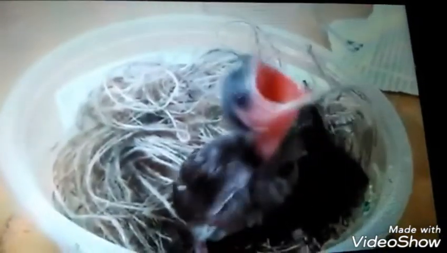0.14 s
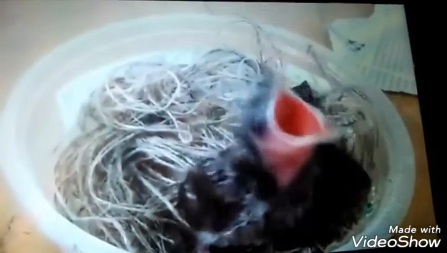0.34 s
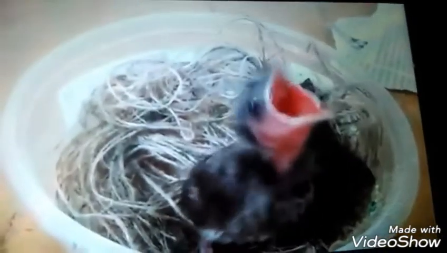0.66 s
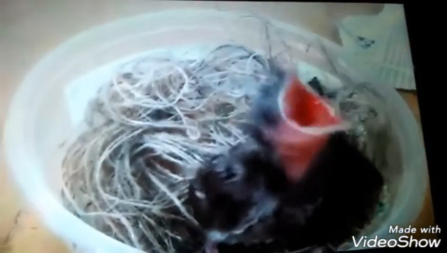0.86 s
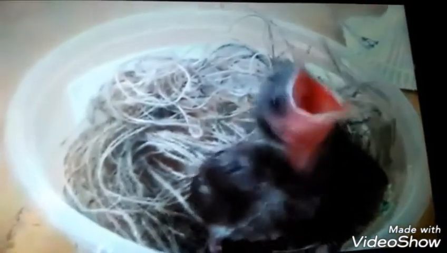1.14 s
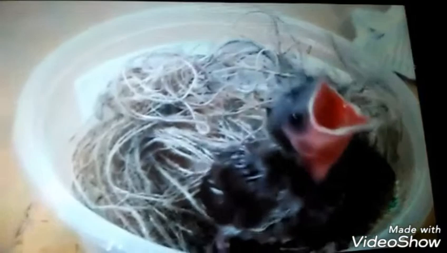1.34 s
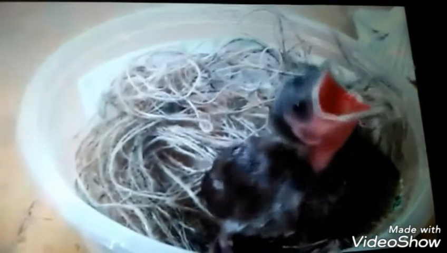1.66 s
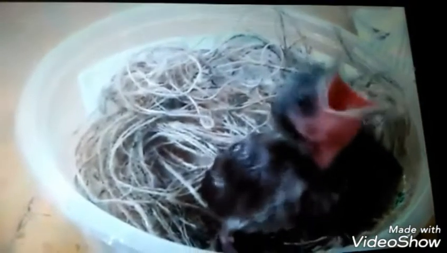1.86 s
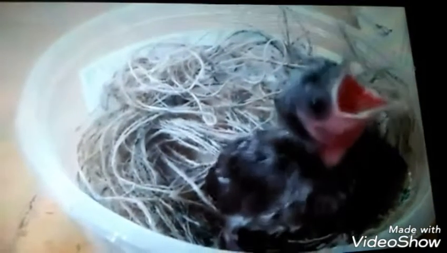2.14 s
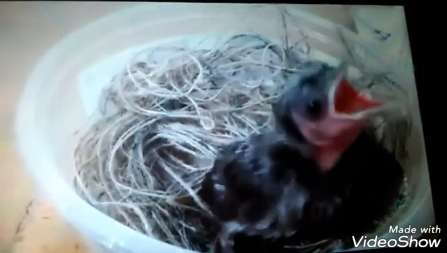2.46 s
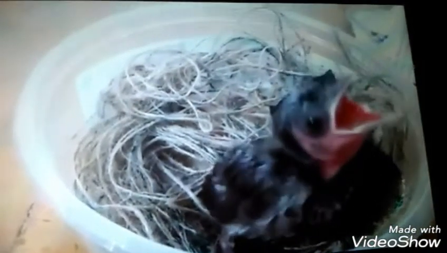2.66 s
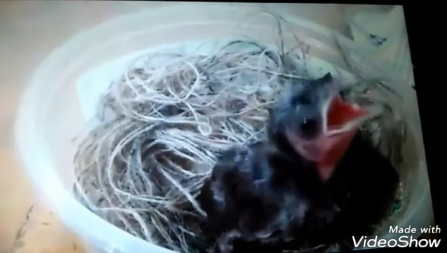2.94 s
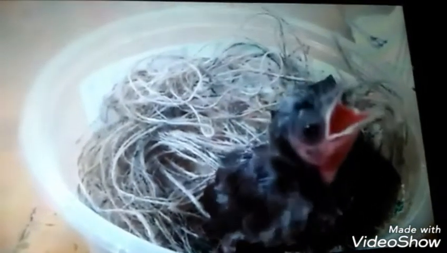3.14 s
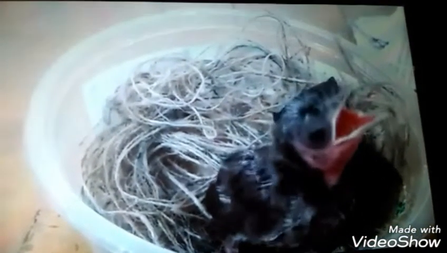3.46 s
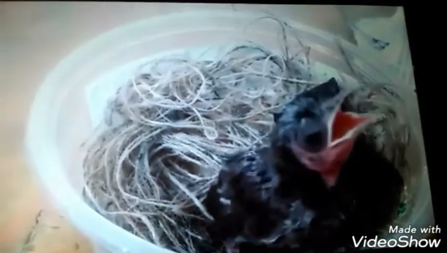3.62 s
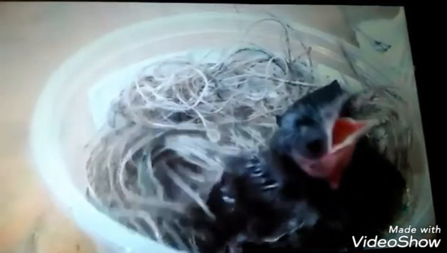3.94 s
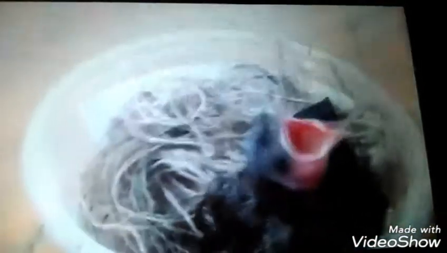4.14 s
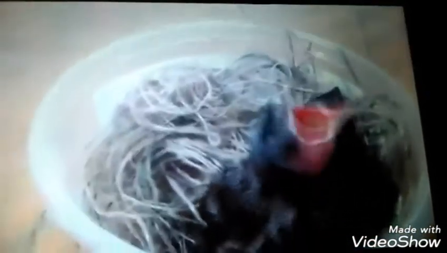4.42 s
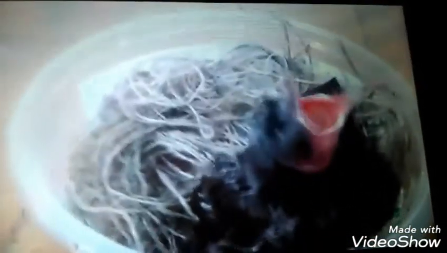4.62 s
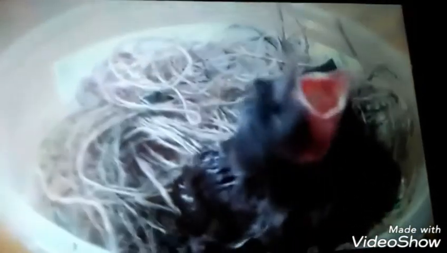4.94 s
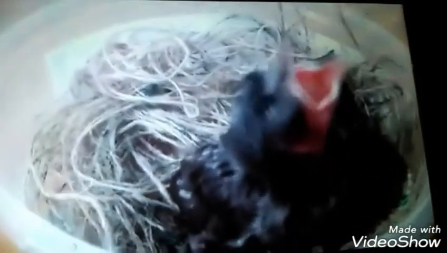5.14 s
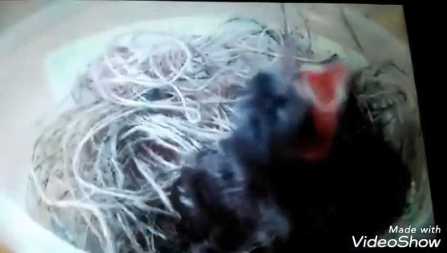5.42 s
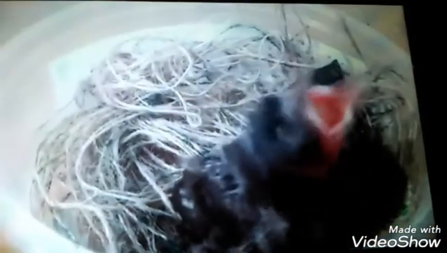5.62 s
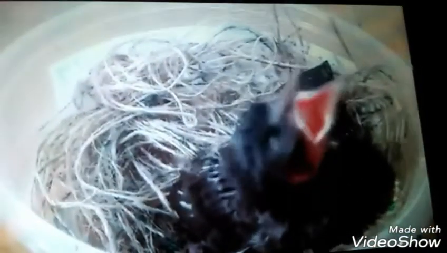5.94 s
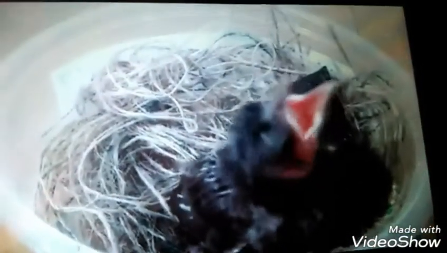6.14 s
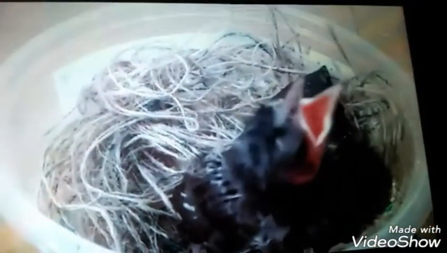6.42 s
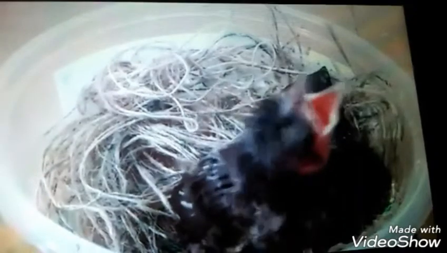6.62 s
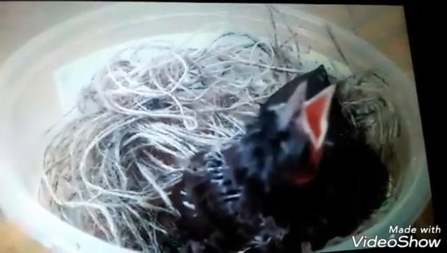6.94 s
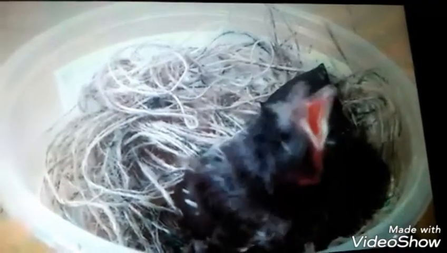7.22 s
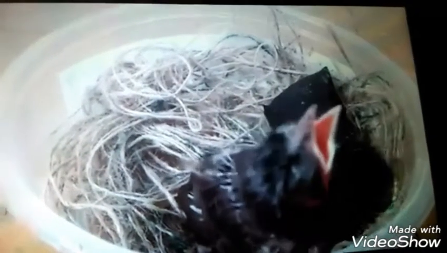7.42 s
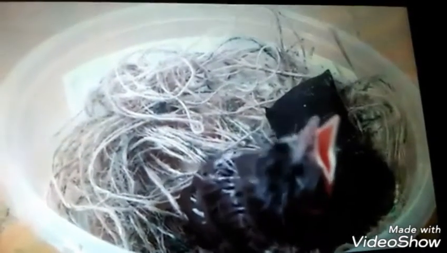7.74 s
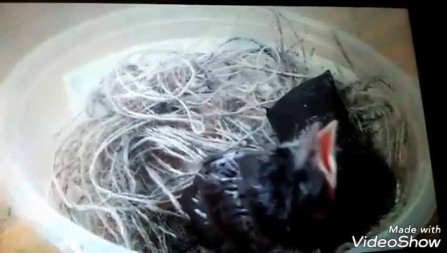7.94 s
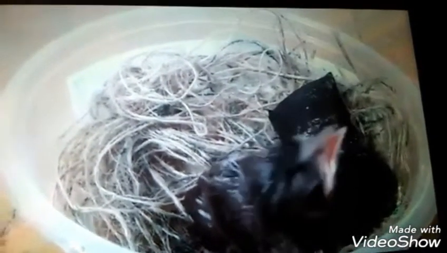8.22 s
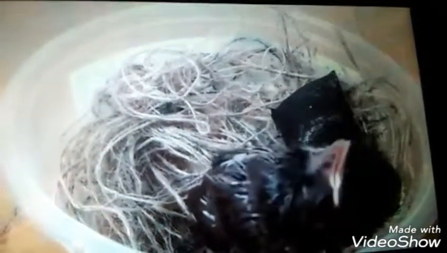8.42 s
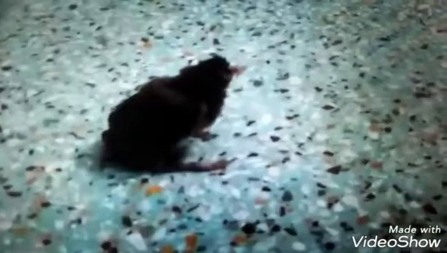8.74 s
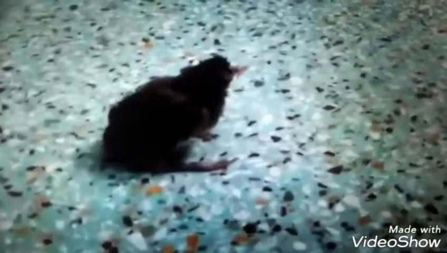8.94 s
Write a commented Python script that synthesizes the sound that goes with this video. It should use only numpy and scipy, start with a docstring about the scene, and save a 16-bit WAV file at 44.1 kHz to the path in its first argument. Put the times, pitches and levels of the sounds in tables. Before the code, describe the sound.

Close, piercing baby bird cheeps repeat steadily in a plastic bowl indoors, turning raspier and then thinner, with airy hiss and low dull knocks behind.

```python
"""Short begging chirps of a nestling in a plastic bowl sound throughout: a clean quavering whistle near 3 kHz,
whose octave the open throat reinforces, breaks into a fast trill that is often hoarse; faint wheezes fall between.
The voice is a sum of frequency-modulated partials, coloured by resonances and reflected by bowl and room.
A soft noise hiss trails each chirp and sometimes swells by itself.
Behind it lie shaped room noise with a faint hum, and the low rubs and knocks of a hand on the microphone."""
import sys
import numpy as np
from scipy import signal
from scipy.fft import rfft, irfft
from scipy.io import wavfile
from scipy.ndimage import uniform_filter1d

SR = 44100
rng = np.random.default_rng(int(sys.argv[2]) if len(sys.argv) > 2 else 0)


def generate_wav(sig):
    """Save sig (samples, or channels by samples) to the path in sys.argv[1] as 16-bit PCM at SR."""
    pcm = np.round(np.clip(np.atleast_2d(sig).T, -1, 1) * 32767).astype(np.int16)
    wavfile.write(sys.argv[1], SR, pcm)


N = 400428

# clean notes, nominal values that whistle() shapes: t/s, length/s, start f/Hz, rise/Hz, quaver depth/Hz,
# fundamental level/dB, octave level/dB, swell of the octave/dB, half-line level/dB
WHISTLES = [(0.03, 0.079, 2970, 219.5, 29, -37, -31, 2.5, -81),
            (0.409, 0.054, 2998, 209, 13, -35.5, -35, -2.5, -72),
            (0.726, 0.081, 2950, 129.5, 89, -38, -32, -1.5, -77.5),
            (1.18, 0.03, 2997, 70, 14, -41.5, -41.5, 11, -84),
            (1.479, 0.092, 2910, 112, 60, -39.5, -32, 0, -87.5),
            (1.962, 0.029, 2978, 130.5, 9.4, -43.5, -50.5, 14, -80.5),
            (2.259, 0.004, 2933, -24, 8.8, -41.5, -39, 6, -59),
            (2.335, .088, 2780, 107, 27, -54, -60.5, 8, -82),
            (2.462, 0.048, 3030, 79, 16, -37, -80, 12, -64),
            (2.816, 0.046, 2906, 138, 57, -36.5, -60.5, 35, -82),
            (2.865, 0.051, 3034, 97, 46, -37.5, -54.5, 4, -60),
            (3.255, 0.025, 3027, 50, 20, -37, -64, -1, -70),
            (3.604, 0.06, 2930, 123, 30, -34.5, -47.5, 20, -86),
            (4.053, 0.049, 2977, 132, 36, -39.5, -54.5, 3, -70),
            (4.425, 0.044, 3040, 147, 31, -43, -60, 1, -69),
            (4.908, 0.074, 2973, 129, 26, -36, -35.5, 11, -76),
            (5.367, 0.085, 2908, 150, 27, -38, -28.5, -1, -56),
            (6.015, 0.04, 2892, 214.5, 10.5, -39, -28.5, 0, -52),
            (6.301, .064, 2950, 26, 51, -35, -23.5, -0.5, -50),
            (6.844, 0.03, 3560, -56.5, 25, -57, -69, 3.5, -95),
            (7.123, 0.024, 3520, 9, 11, -51, -51, 3, -90),
            (7.141, 0.073, 2936, 119.5, 61, -35, -24.5, -0.5, -53),
            (7.339, .013, 3800, -60.5, 20, -50, -66, 2, -47.5),
            (7.351, 0.014, 3180, 50, 25, -74, -42.5, 4, -41),
            (7.842, 0.018, 3600, -62, 15, -63, -80.5, -2, -52),
            (7.857, 0.016, 2944, 20, 14, -69, -40.5, 11, -51),
            (7.874, 0.018, 3080, 185, 12, -62, -42, 3, -36),
            (8.071, 0.056, 2925, 85, 43, -75, -61, -3, -90),
            (8.337, .015, 3600, -19.5, 15, -62, -77.5, 4, -73),
            (8.355, .052, 2973, 49, 34, -63, -32.5, 2.5, -49),
            (8.409, 0.018, 3106, 186, 18, -59, -41.5, 2, -43),
            (8.965, 0.0093, 3650, -27, 15, -61, -68, -6, -72.5),
            (8.974, 0.022, 3060, -40, 33, -65, -36, 11.5, -51)]
# trilled notes, nominal values that trill() shapes: t/s, length/s, f/Hz, trill rate/Hz, swing/Hz,
# hoarseness 0-1, fundamental level/dB, half-line level/dB, octave level/dB, beak resonance f/Hz
TRILLS = [(0.096, 0.047, 3136, 77, 186, 0.01, -47, -74, -36, 6090),
          (0.449, .065, 3150, 82, 230, 0.07, -44.5, -69, -35.5, 6130),
          (0.8, 0.032, 3078, 110, 171, 0.05, -48, -80, -40.5, 5850),
          (1.203, 0.086, 3180, 81, 231, 0.16, -45, -85, -40.5, 5870),
          (1.567, 0.019, 3114, 83, 168, 0.03, -55, -83, -56, 5930),
          (1.995, 0.07, 3150, 101, 217, 0.2, -46.5, -74, -42.5, 5880),
          (2.504, 0.084, 3100, 88, 230, .33, -46, -56, -52, 5550),
          (2.915, .034, 3240, 86, 190, 0.17, -54.5, -56.5, -58, 5100),
          (3.279, 0.091, 3130, 96, 352, 0.33, -51, -58, -47, 5600),
          (3.667, 0.063, 3015, 98, 214, 0.27, -45, -70, -40, 5800),
          (4.092, 0.087, 3130, 117, 363, .42, -47.5, -61, -44.5, 5590),
          (4.46, 0.092, 3416, 84, 386, 0.51, -49, -49.5, -55, 5920),
          (4.978, 0.061, 3140, 88, 215, 0.44, -51, -58, -36, 6130),
          (5.438, 0.025, 3110, 91, 188, .23, -55, -58, -42.5, 6300),
          (6.049, 0.075, 3216, 100, 233, 0.3, -49, -56.5, -34, 6070),
          (6.362, .026, 3173, 66, 183, 0.27, -57, -67, -34, 6070),
          (6.864, 0.079, 3340, 80, 280, 0.21, -49, -78, -31.5, 6050),
          (7.217, 0.016, 3125, 62, 200, 0.05, -51.5, -67.5, -27, 6200),
          (7.363, 0.078, 3610, 92, 400, 0.3, -52.5, -44, -45.5, 6300),
          (7.892, 0.058, 3557, 94, 346, 0.28, -52, -44, -49.5, 6140),
          (8.423, 0.033, 3196, 75, 201, 0.12, -74, -66, -52, 6200),
          (8.996, .064, 3474, 89, 340, .3, -54, -50, -41, 6130)]


def chick(whistle_db=-2.0, trill_db=-1):
    """Superposition: all whistles and trills add up to one dry voice."""
    voice = np.zeros(N)
    for row in WHISTLES:
        s, note = whistle(row)
        add(voice, s, gain_of(whistle_db) * note)
    for row in TRILLS:
        s, note = trill(row)
        add(voice, s, gain_of(trill_db) * note)
    return voice


QUAVERS_PER_S = 48


def whistle(row, jitter_hz=14, shimmer_db=1.94, quaver_db=2.0, third_db=-42, lead_in_db=-22, onset_db=2,
            widening=1.26, bend=1.6, half_swell_db=13, air_db=-31, beak_hz=6200):
    """Frequency modulation: the syrinx sings a rising tone with a widening quaver and a strong octave."""
    s, length, start_hz, rise_hz, depth_hz, first_db, octave_db, swell_db, half_db = row
    early = .2 * length  # soft fade-in ahead of the nominal start
    t, gate = note_gate(length + early, rise=2 * early, fall=.004)
    t = t - early
    progress = np.clip(t / length, 0, 1)
    gate = gate * gain_of(np.interp(t, [-early, 0, early / 2], [lead_in_db, lead_in_db / 2, 0]))

    quaver = np.cos(2 * np.pi * QUAVERS_PER_S * t)
    hz = start_hz + rise_hz * progress ** bend - depth_hz * quaver * (0.53 + widening * progress)
    phase = 2 * np.pi * np.cumsum(hz + jitter_hz * wander(len(t), 130)) / SR

    first = gain_of(first_db + 5.2 * (progress - 1.5)) * np.sin(phase)
    swell_points = [-swell_db / 2 - onset_db, -swell_db / 2, swell_db / 2]
    upper_db = octave_db + np.interp(progress, [0, 1 / 6, 5 / 6], swell_points)
    harmonics = np.sin(2 * phase) + gain_of(third_db) * np.sin(3 * phase)
    upper = gain_of(upper_db + quaver_db * quaver) * harmonics
    # as the note strains, the period doubles: a half-line grows below the octave, and air leaks past
    half = gain_of(half_db + half_swell_db * (progress - 1.5)) * np.sin(3 / 2 * phase)
    breath = evened(throat(rng.standard_normal(len(t)), s, beak_hz))
    air = gain_of(octave_db + air_db) * progress ** 2 * breath

    shimmer = gain_of(shimmer_db * wander(len(t), 78))
    return s + t[0], np.sqrt(2) * gate * (first + upper + half + air) * shimmer


def trill(row, throb_db=5, start_turn=0.18, jitter_hz=130, rasp_db=-1, growth_db=3, arch_db=7, climb_hz=450,
          sink_hz=40, uneven_db=1.85, soft_edge=.05, stumble=0.1, uneven_swing=0.35, snap=0.6):
    """Sawtooth modulation and period doubling: pitch snaps up and slides down; hoarseness makes it stumble."""
    s, length, pitch_hz, rate, swing_hz, rough, first_db, half_db, octave_db, beak_hz = row
    edge = .006 + 2 * soft_edge * rough ** 2
    t, gate = note_gate(length, rise=edge, fall=edge)
    middle = np.clip(t / length, 0, 1) - .5

    uneven_rate = rate * (1 + (0.025 + stumble * rough) * wander(len(t), 90))
    turn = 2 * np.pi * (np.cumsum(uneven_rate) / SR + rate * t[0] + start_turn)
    # snap 0 would be an even vibrato, towards 1 the rise gets abrupt
    saw = np.arctan2(snap * np.sin(turn), 1 - snap * np.cos(turn)) / np.arcsin(snap)
    # the clearest trills sink, hoarse ones climb
    glide_hz = (rough * climb_hz - (1 - rough) * sink_hz) * middle
    swing = swing_hz * (1 - rough / 2 + (0.13 + uneven_swing * rough) * wander(len(t), 85))
    hz = pitch_hz + glide_hz + swing * saw
    phase = 2 * np.pi * np.cumsum(hz + jitter_hz * (rough + 0.12) * wander(len(t), 330)) / SR

    # the drive grows along the note; a hoarse one also arches, and its strength varies at random
    growth = growth_db * (0.5 + rough) * middle
    arch = -arch_db * rough * (2 * middle) ** 2
    effort = gate * gain_of(growth + arch + uneven_db * wander(len(t), 70))
    throb = -throb_db * max(1 - 2 * rough, 0) ** 2 * saw  # clear partials are driven hardest at each slide's foot
    partials = [(1, first_db), (1.5, half_db), (2, octave_db), (2.5, half_db - 24), (3, first_db - 27)]
    voice = 0
    for k, db in partials:
        flutter = 1 + rough * wander(len(t), 360)
        line = effort * gain_of(throb) * np.sin(k * phase) * flutter
        voice = voice + gain_of(db) * evened(throat(line, s, beak_hz, pitch_hz))

    air = evened(throat(effort * rng.standard_normal(len(t)), s, beak_hz, pitch_hz))
    rasp = rough ** 2 * gain_of(rasp_db + max(octave_db, first_db, half_db))
    return s + t[0], voice + rasp * air


# frequency response of throat and bowl together: f/Hz, level/dB
THROAT = [(2300, -25.5), (2750, -11), (3050, -11), (3700, 2), (4200, 12), (4900, 3), (5400, 2), (5900, 2.5),
          (6500, 0), (7100, -7), (8000, -3.5), (8700, -16), (12000, -36)]
# a dip in the voice that fills as the beak closes: t/s, level/dB
NOTCH_DEPTH = [(0, -43), (4.5, -37.5), (7.2, -26), (7.35, -3), (9.08, -7)]
NOTCH_HZ, NOTCH_WIDTH_HZ = 4260, 430
BEAK_DB, BEAK_WIDTH_HZ, BEAK_RISE_HZ_PER_S = 15, 240, 2100
TUNED_DB, TUNED_WIDTH_HZ = 6, 240


def throat(x, s, beak_hz, tuned_hz=3500):
    """Source-filter principle: a rising beak resonance, a second one at tuned_hz and a dip colour the source."""
    size = 16384
    hz = np.fft.rfftfreq(size, 1 / SR)
    t = (np.arange(len(x)) - len(x) / 2) / SR
    depth_db = np.interp(s, *np.transpose(NOTCH_DEPTH))
    notch_db = depth_db * np.exp(-((hz - NOTCH_HZ) / NOTCH_WIDTH_HZ) ** 2)
    beak = gain_of(BEAK_DB) * resonate(x, beak_hz + BEAK_RISE_HZ_PER_S * t, BEAK_WIDTH_HZ)
    tuned = gain_of(TUNED_DB) * resonate(x, tuned_hz, TUNED_WIDTH_HZ)
    return irfft(rfft(x + beak + tuned, size) * gain_of(read(THROAT, hz) + notch_db))[:len(x)]


# faint husky breaths between the chirps: t/s, length/s, level before the soft edges/dB, beak resonance f/Hz
WHEEZES = [(1.069, 0.074, -83, 5500), (4.316, 0.17, -78, 5570), (5.827, 0.066, -71.5, 5560),
           (6.469, 0.04, -51.5, 5070), (6.711, 0.066, -71.5, 5360), (7.701, 0.063, -73.5, 6280)]
WHEEZE_EDGE_S = .04


def wheezes(rough_db=3):
    """Turbulence: air flutters through the chick's throat without a tone."""
    air = np.zeros(N)
    for s, length, db, beak_hz in WHEEZES:
        t, gate = note_gate(length, WHEEZE_EDGE_S, WHEEZE_EDGE_S)
        puff = rng.standard_normal(len(t)) * gain_of(rough_db * wander(len(t), 120))
        add(air, s + t[0], gain_of(db) * gate * evened(throat(puff, s, beak_hz)))
    return air


# small dry ticks: t/s, peak level/dB
TICKS = [(2.264, -47), (7.261, -47), (7.3435, -44)]


def ticks(decay=0.00076, low_hz=4500, high_hz=8500):
    """Impulse excitation: tiny band-passed noise bursts that die quickly, as of the beak or a dry straw."""
    snaps, t = np.zeros(N), np.arange(SR // 50) / SR
    band = signal.butter(2, [low_hz, high_hz], "band", fs=SR, output="sos")
    for s, db in TICKS:
        snap = signal.sosfilt(band, rng.standard_normal(len(t)) * np.exp(-t / decay))
        add(snaps, s, gain_of(db) * snap / abs(snap).max())
    return snaps


# reverberation time, the time to fall by 60 dB: f/Hz, T60/s
ROOM_T60 = [(300, 0.21), (3000, 0.39), (6000, 0.23), (12000, 0.079)]


def room(x, bowl_decay=0.019, tail_db=-21, tail_same=0.93):
    """Reverberation by convolution: quick reflections from bowl and table, then a short diffuse tail."""
    size = SR // 2
    taps = rng.standard_normal((3, size)) * (rng.random((3, size)) < .1)
    hz, t, z = signal.stft(taps, SR, nperseg=256)
    decaying = z * gain_of(-60 * t / read(ROOM_T60, hz)[:, None])
    tail = signal.istft(decaying, SR, nperseg=256)[1][:, :size]
    t = np.arange(size) / SR
    # a shared part and two separate ones make the tail partly alike left and right
    tail = (np.sqrt(tail_same) * tail[2] + np.sqrt(1 - tail_same) * tail[:2]) * (t > .006)
    early = rng.standard_normal(size) * np.exp(-t / bowl_decay) * (t > .002)
    early = gain_of(-10.5) * early / np.linalg.norm(early)
    response = early + gain_of(tail_db) * tail / np.linalg.norm(tail[0])
    return x + signal.fftconvolve(x[None], response, axes=1)[:, :N]


# relative spectrum of the hiss that lingers after a chirp: f/Hz, level per Hz/dB
LINGER_SHAPE = [(2400, -17), (3100, -8), (3700, -14), (4250, -31.5), (5000, -8.5), (6000, 7.5),
                (7500, -5.5), (8500, -6), (11000, -35)]


def lingering(voice, level_db=-57, decay=0.066, ring_db=-60, ring_hz=3080):
    """Exponential decay: a wide hiss dies away after each strong chirp; a strong fundamental leaves a ring."""
    keep = np.exp(-1 / (decay * SR))
    wide = signal.lfilter([1 - keep], [1, -keep], sounding(voice, threshold_db=-54))
    fundamental = resonate(voice, ring_hz, 200)
    low = signal.lfilter([1 - keep], [1, -keep], sounding(fundamental, threshold_db=-45))
    ring = evened(resonate(resonate(rng.standard_normal(N), ring_hz, 400), ring_hz, 400))
    return gain_of(level_db) * wide * noise(LINGER_SHAPE, patchy_db=6.0) + gain_of(ring_db) * low * ring


# swells of the hiss: t of the peak/s, rise/s, fall/s, soft level/dB, bright level/dB (before flicker and HISS_TOP)
HISS_SWELLS = [(.18, 0.1, 0.13, -64, -76), (.53, 0.44, 0.26, -66.5, -75.5), (.76, 0.049, 0.074, -73, -78.5),
               (.92, 0.086, 0.15, -70, -76.5), (1.251, 0.076, 0.42, -83, -90),
               (2.265, 0.018, 0.18, -79, -78), (2.56, .2, 0.19, -105, -80), (2.97, .11, 0.25, -56, -68),
               (3.45, 0.53, 0.54, -62.5, -81.5), (3.69, 0.07, 0.054, -73.5, -94),
               (3.9, 0.18, 0.17, -47.5, -73.5), (4.8, .2, 0.51, -59.5, -87.5), (5.0, 0.06, .16, -45.5, -46),
               (5.179, 0.067, 0.42, -61.5, -80), (6.03, 0.14, 0.4, -59, -67),
               (6.33, 0.16, 0.12, -63.5, -66), (6.463, .08, 0.11, -44, -55),
               (6.61, 0.21, 0.12, -67.5, -78.5), (7.02, 0.21, 0.41, -59, -81.5),
               (7.251, 0.062, 0.027, -50.5, -58), (7.6, 0.38, 0.21, -78.5, -88),
               (8.419, 0.11, 0.32, -69, -100)]
# relative spectrum of the soft hiss: f/Hz, level per Hz/dB
HISS_SHAPE = [(2500, -4), (4300, -33), (5200, -12), (5900, 5.5), (7600, 14.5), (8500, 7.5), (9600, 10.5),
              (11000, -1.5), (12300, -14.5), (14000, -16)]
# relative spectrum of the bright hiss: f/Hz, level per Hz/dB
SWISH_SHAPE = [(2500, -20), (3700, -3), (4300, -12), (5500, -2.5), (7700, -5), (10000, -11), (12500, -6),
               (14000, -26.5)]
# gain of the hiss above HISS_TOP_HZ: t/s, level/dB
HISS_TOP = [(0, 3), (6.5, 0), (6.9, -10.5), (7.25, 3), (7.45, -21.5), (9.08, -16)]
HISS_TOP_HZ = 10020


def hiss(voice, chirp_db=-62, hold_s=0.17, floor_db=-94, flicker_db=2.0, lead_s=0.04, grain_db=-4.0):
    """Envelope following: high noise rises with each chirp and fades after it; at set times it swells alone."""
    fade = np.cos(np.linspace(0, np.pi / 2, round(hold_s * SR))) ** 2
    lead = round(lead_s * SR)  # the hiss fades up slightly ahead of the tone
    held = signal.oaconvolve(sounding(voice, threshold_db=-47.5), fade / fade.sum())
    trail = uniform_filter1d(held, size=2 * lead + 1)
    soft = gain_of(floor_db) + gain_of(chirp_db) * trail[lead // 2:][:N]
    t, bright = np.arange(N) / SR, np.zeros(N)
    for s, rise, fall, soft_db, bright_db in HISS_SWELLS:
        swell = np.sin(np.pi / 2 * np.interp(t - s, [-rise, 0, fall], [0, 1, 0])) ** 2
        soft = soft + gain_of(soft_db) * swell
        bright = bright + gain_of(bright_db) * swell
    bright = bright * evened(gain_of(grain_db * drift(hz=260)))  # the bright swells rustle
    air = soft * noise(HISS_SHAPE, patchy_db=4.5, size=12, count=12)
    air = air + bright * noise(SWISH_SHAPE, patchy_db=4, size=10, count=16)
    top_pass = 1 / (1 + (HISS_TOP_HZ / (np.fft.rfftfreq(N, 1 / SR) + 1)) ** 24)
    top = irfft(rfft(air) * top_pass, N)
    return (air + (follow(HISS_TOP) - 1) * top) * gain_of(flicker_db * drift(hz=28))


# knocks of the hand, before the trim thump_db: t/s, nominal level/dB, f/Hz
THUMPS = [(0.053, -45, 61), (0.661, -45, 160), (0.839, -55, 59.6), (0.93, -38.5, 83), (1.071, -57.5, 41.8),
          (1.523, -43, 60), (2.383, -40, 55), (4.155, -40.5, 87), (4.404, -39, 56), (5.808, -36.5, 125),
          (6.506, -42, 61), (7.666, -39, 56.5)]
# rubs of the hand: t/s, length/s, level/dB
RUBS = [(0.048, 0.046, -48.5), (0.61, 0.087, -52), (0.82, 0.29, -52), (1.53, 0.096, -56),
        (1.66, 0.078, -54), (2.018, 0.067, -57.5), (2.13, 0.12, -59), (2.308, 0.055, -56.5),
        (2.38, 0.018, -64), (4.143, 0.07, -52), (4.293, 0.0064, -45), (4.393, 0.12, -53.5),
        (4.477, 0.12, -63), (5.35, 0.15, -56), (5.785, 0.064, -55.5), (6.51, 0.032, -66),
        (7.206, 0.016, -53), (7.518, 0.069, -63), (7.69, 0.028, -63), (7.76, 0.033, -73),
        (7.884, 0.029, -55.5), (8.404, 0.055, -64.5), (8.51, 0.042, -63)]
RUB_EDGE_S = 0.035
# low rumble of the grip between rubs, before the trim grip_db: t/s, level/dB
GRIP_LEVEL = [(0, -61.5), (2.2, -64), (2.7, -66), (3.3, -71.5), (3.8, -60.5), (4.4, -69), (5, -64.5),
              (6.4, -67), (7, -61), (7.8, -62), (8.1, -62), (8.55, -53.5), (8.62, -82.5), (9.08, -70.5)]
# relative spectrum of rubs and rumble: f/Hz, level per Hz/dB
RUMBLE_SHAPE = [(20, -16), (35, 8), (55, 6.5), (100, -3.5), (170, -5.5), (260, -29.5), (500, -48),
                (3000, -61.5)]


def handling(grip_db=1, thump_db=-4, rise_cycles=.42):
    """Structure-borne sound: each knock is a heavily damped low oscillation, each rub a burst of low noise."""
    knocks, t = np.zeros(N), np.arange(SR // 6) / SR
    for s, db, hz in THUMPS:
        rise = rise_cycles / hz
        push = t / rise * np.exp(1 - t / rise)
        add(knocks, s, gain_of(db + thump_db) * push * np.sin(2 * np.pi * hz * t))
    rubbing = gain_of(grip_db + 1.5 * drift(hz=7)) * follow(GRIP_LEVEL)
    for s, length, db in RUBS:
        t, gate = note_gate(length, RUB_EDGE_S, RUB_EDGE_S)
        add(rubbing, s + t[0], gain_of(db) * gate)
    return knocks + rubbing * noise(RUMBLE_SHAPE, patchy_db=3, size=6)


# relative spectrum of the room noise: f/Hz, level per Hz/dB
ROOM_NOISE = [(110, -39.5), (180, -3.5), (234, -21.5), (293, 2.5), (372, -47), (436, -3.5), (522, -12),
              (662, -6), (734, -3), (920, 3.5), (1400, -10.5), (1860, -13), (2490, -16.5), (2700, -20),
              (3510, -40.5), (5940, -120)]
# its course: t/s, level/dB
ROOM_LEVEL = [(0, -58.5), (2.2, -57.5), (3.2, -57.5), (4.4, -57.5), (5.8, -57), (6.6, -58), (7.5, -59),
              (8.55, -59.5), (8.62, -70), (9.08, -62)]
# relative spectrum of the patchy upper room noise: f/Hz, level per Hz/dB
UPPER_AIR = [(900, -23), (1250, 0.5), (1600, -6.5), (1900, 2), (2300, -9.5), (2800, -19), (3600, -35)]
# its course: t/s, level/dB
UPPER_LEVEL = [(0, -65.5), (.4, -62), (1.1, -66.5), (2.35, -63.5), (3.1, -75), (3.8, -64.5), (4.6, -66.5),
               (5.3, -81.5), (6.1, -65), (7, -81), (9.08, -85)]
# relative spectrum of the narrow, hollow noise near the end: f/Hz, level per Hz/dB
HOLLOW_SHAPE = [(300, -28), (600, -18.5), (780, 0.5), (930, -12.5), (1200, -13.5), (2500, -84)]
# hum tones: f/Hz, level/dB
HUM = [(50, -82), (291, -79.5)]


def background(hollow_db=-61):
    """Spectral shaping: patchy room noise with a faint phase-wandering hum; near the end it turns hollow."""
    t = np.arange(N) / SR
    hum = 0
    for hz, db in HUM:
        phase_walk = np.cumsum(0.017 * rng.standard_normal(N))
        hum = hum + gain_of(db) * evened(np.sin(2 * np.pi * hz * t + phase_walk))
    hollow_gain = gain_of(hollow_db) * np.interp(t, [8.58, 8.62], [0, 1])
    hollow = hollow_gain * noise(HOLLOW_SHAPE, patchy_db=3.5)
    air = follow(ROOM_LEVEL) * noise(ROOM_NOISE, patchy_db=3.4, size=8, count=4)
    upper = follow(UPPER_LEVEL) * noise(UPPER_AIR, patchy_db=6.5, size=14, count=3)
    return air + upper + hum + hollow


# likeness of the left and right noise: f/Hz, correlation 0-1
SAME = [(40, 1), (250, 0.91), (1000, 0.97), (2500, 0.8), (5000, 0.38), (8000, 0.65), (13000, 0.15)]


def noise(shape, patchy_db, size=14, count=7):
    """Short-time synthesis: partly correlated stereo noise, rms 1, patches size frames by count bins."""
    frames, hz = N // 256 + 5, np.fft.rfftfreq(1024, 1 / SR)
    a, b, c, d, patches = rng.standard_normal((5, frames, len(hz)))
    patches = uniform_filter1d(patches, size=size, axis=0)
    patches = evened(uniform_filter1d(patches, size=count, axis=1))
    same = np.clip(read(SAME, hz), 0, 1)
    mid = np.sqrt(1 + same) * (a + 1j * b)
    side = np.sqrt(1 - same) * (c + 1j * d)
    z = np.array([mid + side, mid - side]) * gain_of(read(shape, hz) + patchy_db * patches)
    sound = signal.istft(z, nperseg=1024, noverlap=768, time_axis=1, freq_axis=2)[1]
    return evened(sound[:, :N])


def resonate(x, hz, width):
    """Heterodyne resonance: a one-pole filter of gain 1 and given width in Hz follows the curve hz."""
    turn = np.exp(2j * np.pi * np.cumsum(hz * np.ones(len(x))) / SR)
    r = np.exp(-np.pi * width / SR)
    return 2 * (turn * signal.lfilter([1 - r], [1, -r], x / turn)).real


def sounding(voice, threshold_db):
    """Power detection: near 1 while a chirp is above the threshold, 0 in the pauses."""
    power = abs(uniform_filter1d(voice ** 2, size=400))
    return power / (power + gain_of(threshold_db) ** 2)


def note_gate(length, rise, fall):
    """Raised-cosine envelope: time from the start of a note, and a gain with soft edges around it."""
    t = np.arange(-rise / 2, length + fall / 2, 1 / SR)
    ramp = np.minimum(t / rise + .5, (length - t) / fall + .5)
    return t, np.sin(np.pi / 2 * np.clip(ramp, 0, 1)) ** 2


def wander(size, hz):
    """Low-passed noise: a smooth random course of rms 1, up to about hz."""
    f = np.fft.rfftfreq(16384, 1 / SR)
    course = irfft(rfft(rng.standard_normal(16384)) / (1 + (f / hz) ** 2))
    return np.resize(evened(course), size)


def drift(hz):
    """Low-passed noise: a random course of rms 1 over the whole scene, up to about hz."""
    f = np.fft.rfftfreq(N, 1 / SR)
    return evened(irfft(rfft(rng.standard_normal(N)) / (1 + (f / hz) ** 2) ** 2, N))


def gain_of(db):
    """Logarithmic level: decibels to an amplitude factor."""
    return 10 ** (np.asarray(db) / 20)


def evened(x):
    """Normalization: scales to rms 1."""
    return x / np.sqrt(np.mean(x ** 2) + 1e-20)


def read(points, hz):
    """Interpolation: reads a spectrum on a log-frequency axis."""
    f, value = np.transpose(points)
    return np.interp(np.log(hz + 1), np.log(f + 1), value)


def follow(rows):
    """Interpolation: a level curve as a gain for every sample."""
    s, db = np.transpose(rows)
    return gain_of(np.interp(np.arange(N) / SR, s, db))


def add(mix, s, sound):
    """Superposition: mixes a sound in at time s."""
    part = mix[..., max(round(s * SR), 0):][..., :sound.shape[-1]]
    part += sound[..., :part.shape[-1]]


def scene():
    """Superposition: the reverberant chick over its hiss, the room noise and the hand."""
    voice = chick()
    near = room(voice + wheezes() + ticks())
    return near + lingering(voice) + hiss(voice) + background() + handling()


EDGE_HZ = 14100


def record(dry):
    """Band limitation: the microphone's bass roll-off, then a steep upper edge."""
    thin = signal.sosfilt(signal.butter(5, 42, "high", fs=SR, output="sos"), dry)
    low_pass = signal.firwin(511, EDGE_HZ, window=("kaiser", 9), fs=SR)
    return signal.oaconvolve(thin, low_pass[None], "same")


dry = scene()
out = record(dry)
generate_wav(out)
```